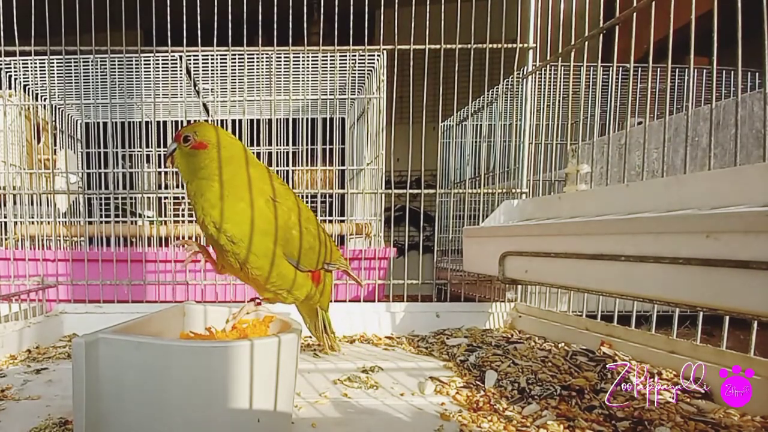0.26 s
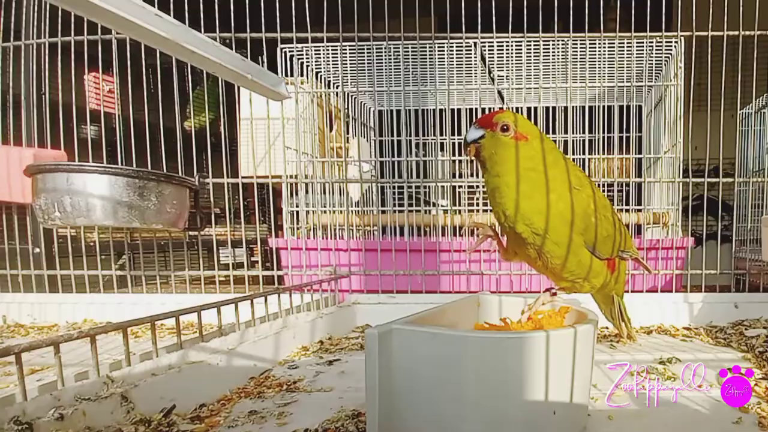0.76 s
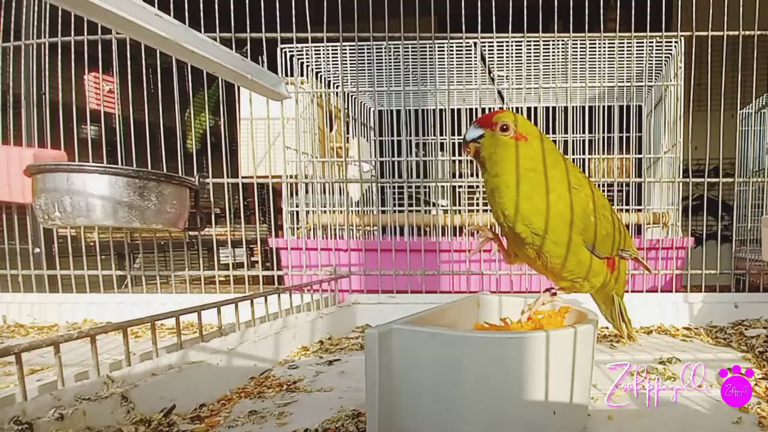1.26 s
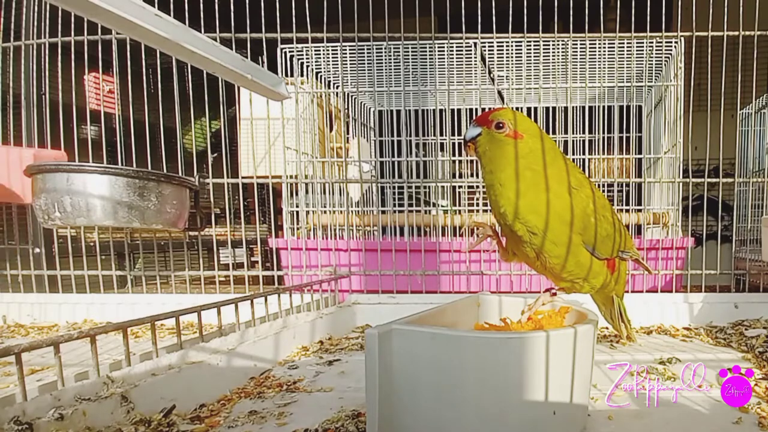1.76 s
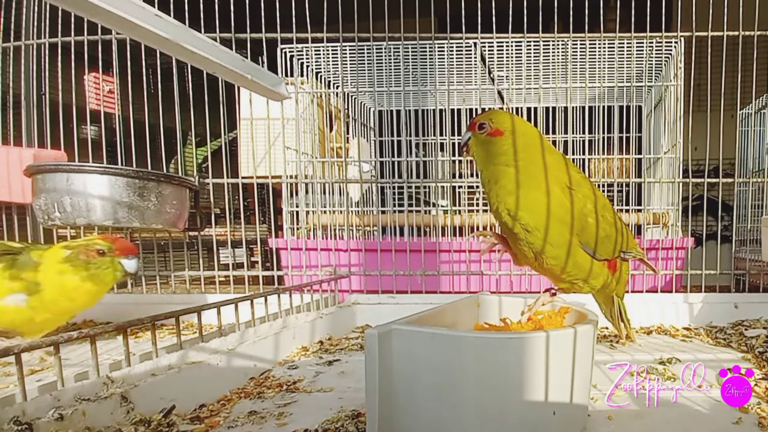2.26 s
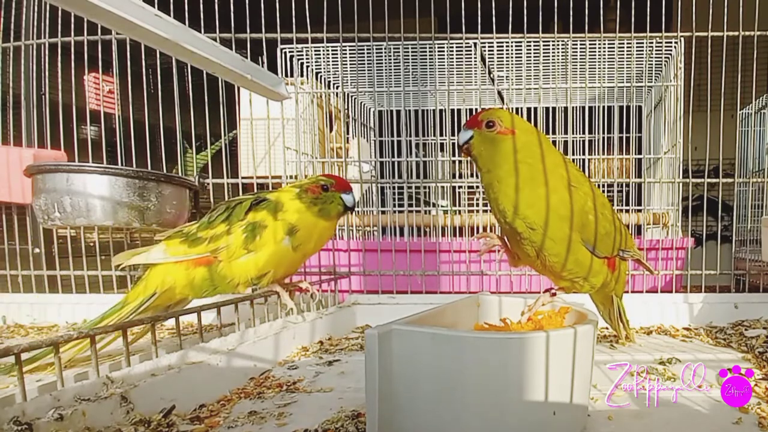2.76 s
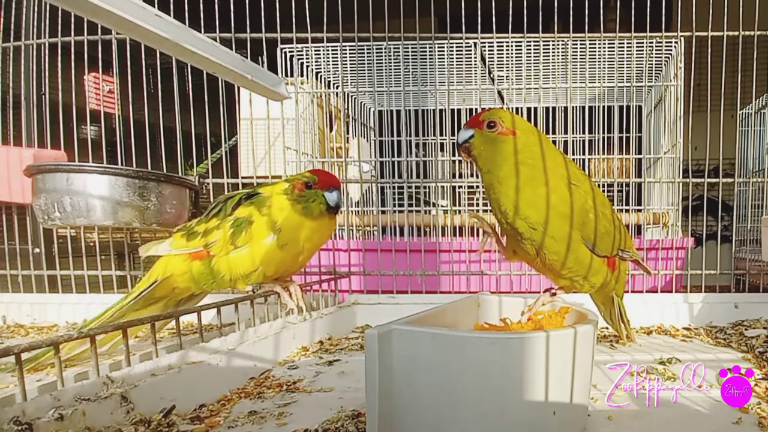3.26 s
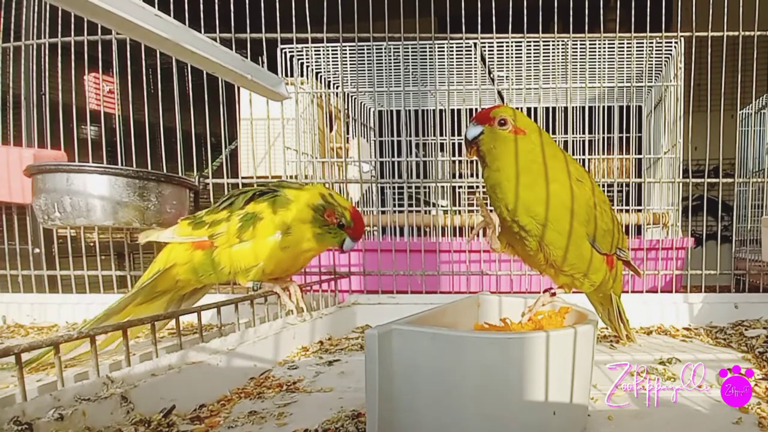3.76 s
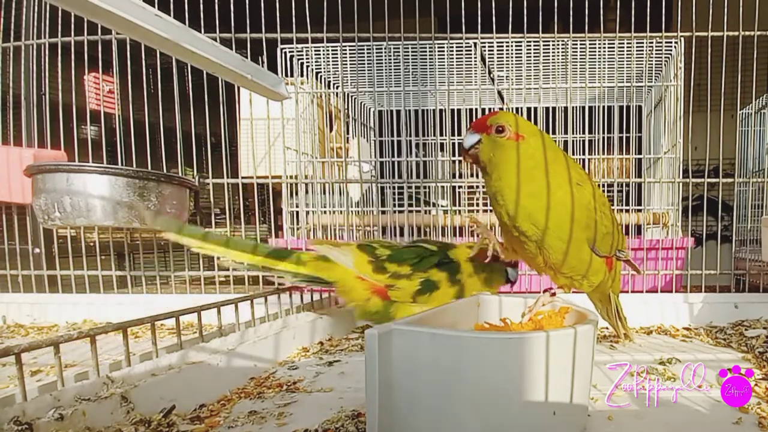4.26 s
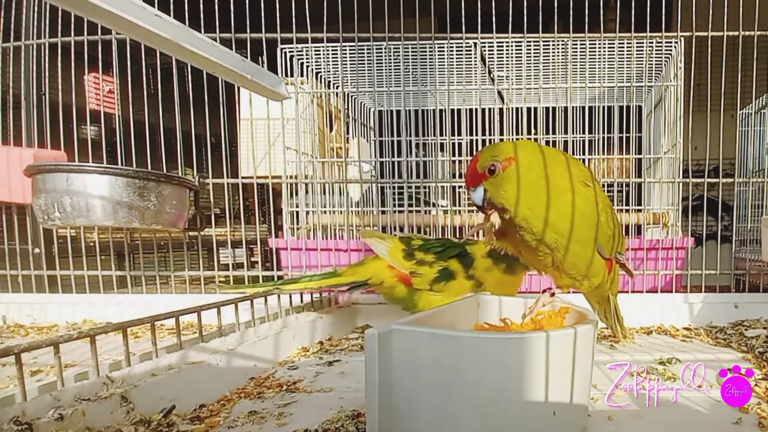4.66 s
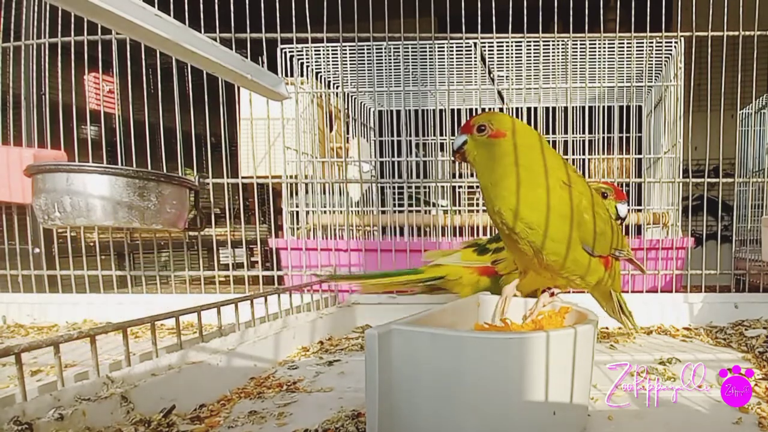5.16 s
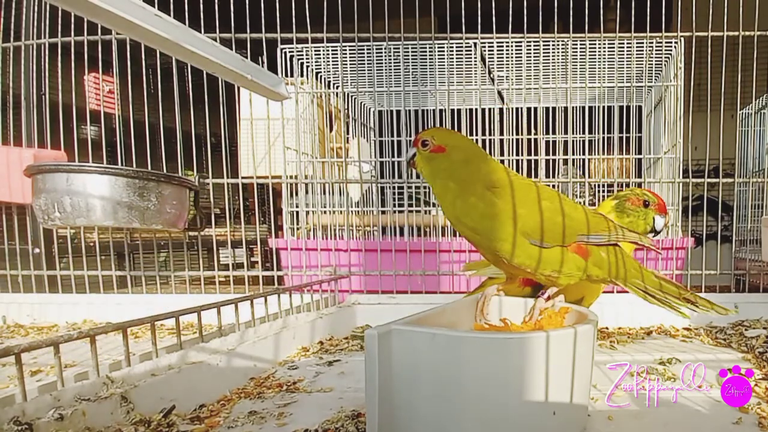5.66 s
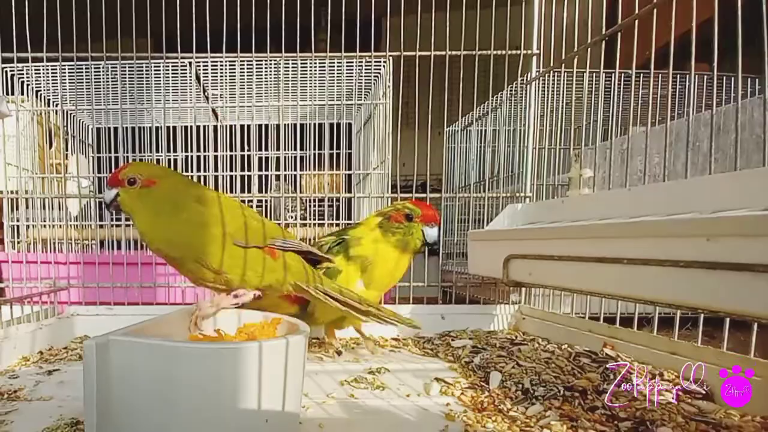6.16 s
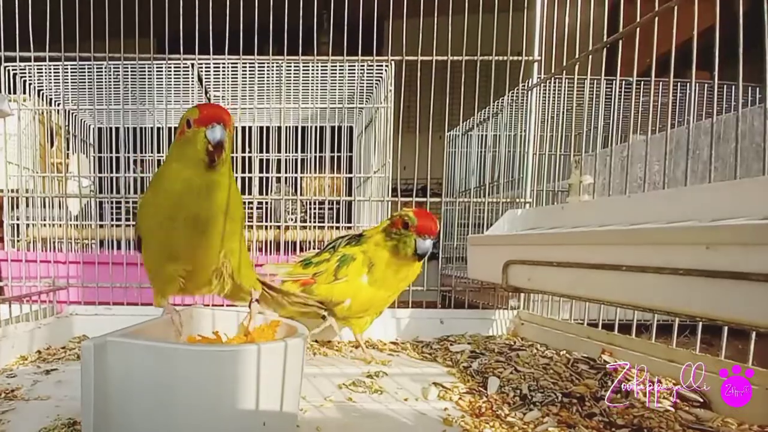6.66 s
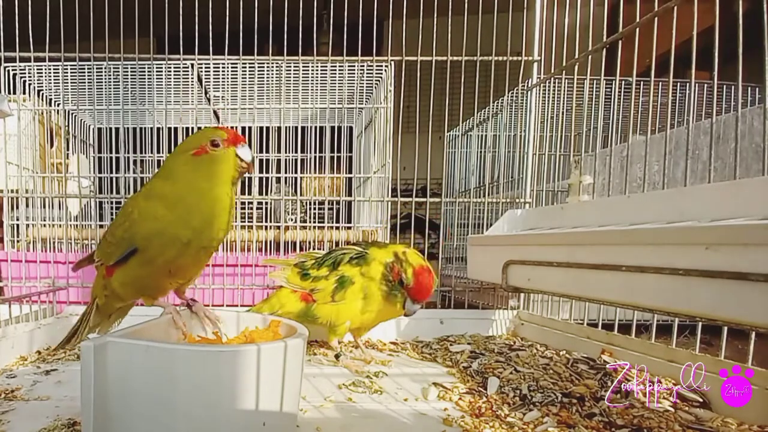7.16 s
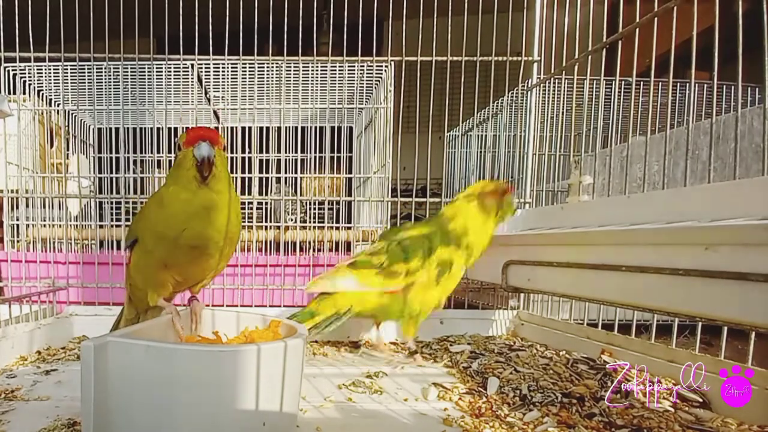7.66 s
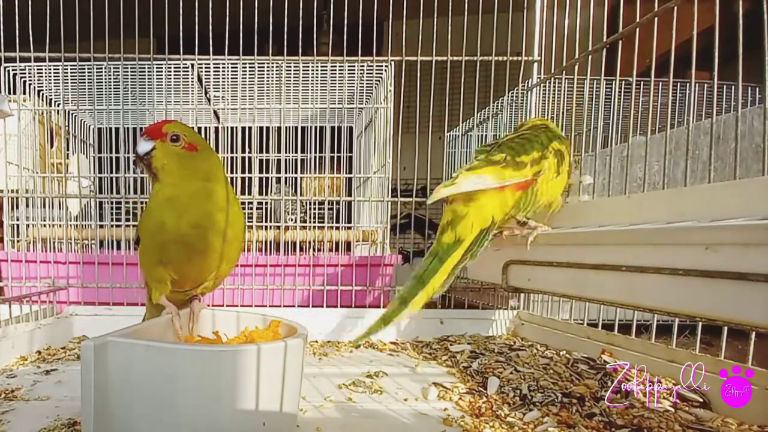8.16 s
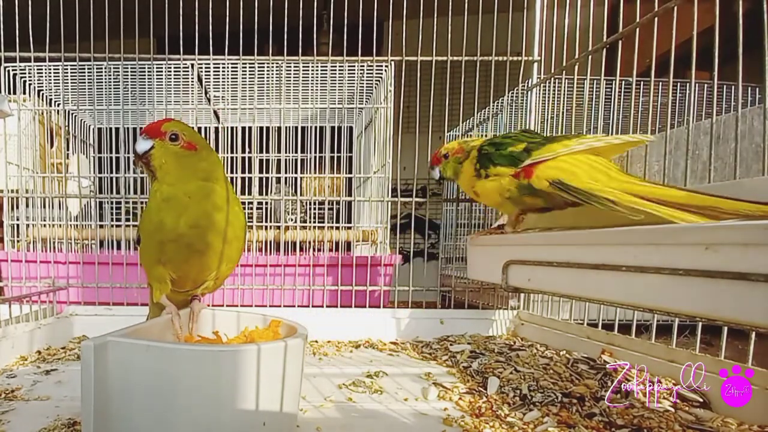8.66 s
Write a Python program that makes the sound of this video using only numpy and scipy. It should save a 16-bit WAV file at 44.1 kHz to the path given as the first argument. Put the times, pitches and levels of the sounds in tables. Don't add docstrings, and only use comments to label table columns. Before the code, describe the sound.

A quiet, hard-walled room with low rumble, light hiss and a faint drone that swells now and then, strongest around 5 s. Close by, small parrots move in a wire cage. The first 1.5 s hold only faint coos, thin distant piping and tiny husk ticks. Husks rustle at 1.6, a hollow dish knock lands at 1.8, and scrabbling with a short rising creak comes at 2.2-2.4. Two bright whistled chirps sweep upward at 3.1 and 3.3, ringing in the room over rustling. At 4.15-4.2 a hop gives sharp claw clicks and knocks; more snaps follow at 4.8 and 5.4. Taps and brushing scuffs come around 6-6.4, light pecks at 6.6, clicks at 7-7.1. From 7.4 it gets busiest: scrabbling, feathery brushes, a rising creak, a falling coo and the loudest crack at 7.7 with a soft thump. Claw ticks at 8.2 and small husk cracks finish.

```python
import sys
import numpy as np
from scipy import signal
from scipy.fft import rfft, irfft
from scipy.io import wavfile
from scipy.ndimage import uniform_filter1d

SR = 44100
rng = np.random.default_rng(int(sys.argv[2]) if len(sys.argv) > 2 else 0)


def how_loud(loudness_db):
    steps = np.asarray(loudness_db, float) / 20
    return 10 ** steps


def inscribe(sig):
    pcm = np.round(np.clip(np.atleast_2d(sig).T, -1, 1) * 32767)
    wavfile.write(sys.argv[1], SR, pcm.astype(np.int16))


N = 392490


def level(x, db):
    return x * how_loud(db) / np.sqrt(np.mean(x ** 2))


def shape(points, hz):
    f, db = np.transpose(points)
    return np.interp(np.log(hz + 1), np.log(f + 1), db)


def causal(db):
    cepstrum = irfft(db * np.log(10) / 20)
    half = cepstrum.shape[-1] // 2
    cepstrum[..., 1:half] *= 2
    cepstrum[..., half + 1:] = 0
    return np.exp(rfft(cepstrum))


def colour(x, points):
    gain = how_loud(shape(points, np.fft.rfftfreq(N, 1 / SR)))
    return irfft(rfft(x) * gain, N)


def walk(rate_hz):
    hold = int(SR / rate_hz)
    steps = np.repeat(rng.standard_normal(N // hold + 1), hold)
    return 2.11 * uniform_filter1d(uniform_filter1d(steps, hold), hold)[:N]


def grains(count):
    size_db = 2.5 * np.minimum(rng.exponential(size=(count, N)), 6)
    return rng.standard_normal((count, N)) * how_loud(size_db)


# (time [s], left microphone late by [samples], left minus right [dB])
STAND = [(0, -17, 4), (3.2, -16, 14), (4.2, -11.5, -7.5), (4.7, 0, -5), (6.2, 11, -13), (6.8, -6, -4.5),
         (7.7, 12.5, -15.5), (8.9, 7, -8)]


def place(times_s, peak_db, pan_db, waves):
    size = waves.shape[1]
    out = np.zeros((2, N + size + 64))
    when_s, lag_samples, _ = np.transpose(STAND)
    lags = np.interp(times_s, when_s, lag_samples)
    for s, db, pan, lag, wave in zip(times_s, peak_db, pan_db + 0 * times_s, lags, waves):
        for side, sign in enumerate((1, -1)):
            at = max(int(s * SR + sign * lag / 2), 0)
            out[side, at:at + size] += wave * how_loud(db + sign * pan / 2) / np.abs(wave).max()
    return out[:, :N]


def blows(table, t60_s, size, spread, push_cycles, pan_db):
    s, db, hz = np.transpose(table)[:, :, None]
    t = np.arange(size) / SR
    chance = rng.standard_normal((len(s), 3))
    modes = 0
    for k in (-1, 0, 1):
        mode_hz = hz * (1 + spread * k * (1 + 0.37 * chance[:, [k + 1]]))
        modes = modes + np.sin(2 * np.pi * mode_hz * t) * (1 - abs(k) * 0.67)
    swell = 1 - np.exp(-t * hz / push_cycles)
    decay = np.exp(-np.log(1000) * t / t60_s)
    return place(s[:, 0], db[:, 0], pan_db, modes * swell * decay)


def voice(notes, partials_db, rough, shake_hz, tremble_db, lag_samples, pan_db, throat_hz=20000):
    out = np.zeros(N)
    wobble, tremble = walk(shake_hz), how_loud(tremble_db * walk(350))
    for note in notes:
        a, b = max(int(note[0][0] * SR), 0), int(note[-1][0] * SR)
        s, hz, db = np.transpose(note)
        t = np.arange(a, b) / SR
        pitch = np.interp(t, s, hz)
        phase = 2 * np.pi * np.cumsum(pitch * (1 + rough * wobble[a:b])) / SR
        tone = 0
        for k, partial_db in enumerate(partials_db, 1):
            throat = 1 / (1 + (k * pitch / throat_hz) ** 6)
            tone = tone + how_loud(partial_db) * np.sin(k * phase) * throat
        ends = signal.windows.tukey(b - a, .15)
        out[a:b] += tone * how_loud(np.interp(t, s, db)) * ends * tremble[a:b]
    return np.array([np.roll(out, int(lag_samples)) * how_loud(pan_db / 2), out * how_loud(-pan_db / 2)])


def sung(calls, course, swell=1):
    rising = np.array(course, float)
    falling = np.c_[1 - rising[::-1, :2], rising[::-1, 2]]
    notes = []
    for s, long, first, last, db in calls:
        path = rising if last >= first else falling
        notes.append([(s + long * at, first + (last - first) * up, db + swell * under)
                      for at, up, under in path])
    return notes


# (time [s], peak [dB], brightest [Hz], length [ms])
CRACKS = [(0.9414, -37.5, 1820, 0.95), (0.9871, -28, 2460, 0.4), (1.6465, -21, 6700, 1.5),
          (2.3462, -25, 5220, 2.7), (2.4316, -12, 6200, 0.39), (4.78, -37.5, 5320, 0.9),
          (4.815, -5, 6110, 0.37), (6.2124, -30.5, 6630, 1.2), (6.58, -34, 6950, 1.13),
          (6.665, -34.5, 2800, 1.3), (7.0496, -34, 6750, 1.2), (7.106, -10.5, 6655, 0.35),
          (7.4406, -9.5, 6800, 0.64), (7.639, -10.5, 3173, 2.3), (1.822, -28, 6870, 1.2),
          (7.707, -22, 6670, 2.8), (7.7248, 1.5, 5560, 2.9), (7.8686, -26.5, 6520, 2.1),
          (8.2994, -37.5, 5140, 1.2), (8.6077, -23, 5200, 1.2), (8.6773, -31, 5180, 1.1),
          (8.69, -22.5, 4800, 0.496), (8.768, -29, 6740, 1.5), (8.8306, -20.5, 6600, 1.13),
          (8.8424, -29.5, 6640, 2.7)]
TAPS = [(0.8744, -48, 2010, 1.7), (1.0233, -38, 6500, 1.3), (1.2306, -41.5, 6200, 2.4),
        (1.79, -16.5, 5000, 2.3), (2.1733, -24, 5940, 0.73), (2.1799, -17, 3100, 0.51),
        (2.286, -26, 5400, 2.5), (2.2974, -15.5, 2550, 1.8), (4.145, -18.5, 5600, 1.3),
        (4.1543, -16, 4460, 3), (4.1847, -4, 6000, 0.66), (4.188, -8, 6150, 1.4), (5.4213, -6, 5800, 0.92),
        (5.9603, -10, 3020, 0.41), (6.0328, -32, 2530, 1.8), (6.124, -22.5, 6760, 0.6),
        (6.135, -15, 6700, 0.87), (6.699, -33.5, 6240, 2.3), (6.971, -13, 6480, 0.6),
        (6.9793, -21.5, 6280, 2.5), (7.4863, -20.5, 7126, 0.71), (7.7507, -10.5, 4100, 3.3),
        (8.2846, -35, 5140, 1.78), (8.1581, -22.5, 5870, 0.38), (4.0125, -30, 5330, 1),
        (4.606, -35, 5500, 0.93)]
STEPS = [(2.1665, -35, 5600, 0.87), (2.5341, -40, 5340, 2.5), (3.1127, -33, 3520, 2.5),
         (4.632, -20, 5600, 0.96), (4.805, -15, 5920, 0.875), (5.244, -19.5, 5620, 2.7),
         (5.333, -28.5, 5840, .9), (5.4161, -10, 3250, 0.244), (4.719, -40.5, 2680, 1.1),
         (6.502, -53, 2800, 1.1)]
# (frequency [Hz], density [dB/Hz])
SNAP = [(400, -13), (1000, -14), (2000, -11), (3500, -2.5), (6000, -8.5), (9000, -5.5), (13000, -10),
        (17000, -12)]


def clicks():
    s, db, hz, ms = np.transpose(CRACKS + TAPS + STEPS)
    treble_db = np.repeat([-3.5, -14, -33.5], [len(CRACKS), len(TAPS), len(STEPS)])
    t, f = np.arange(1024) / SR, np.fft.rfftfreq(1024, 1 / SR)
    chance = rng.standard_normal((len(s), len(t)))
    age = 1000 * t / np.clip(ms, .15, 2.2)[:, None]
    cracks = chance * np.abs(chance) ** 0.86 * age ** 0.46 * np.exp(-age)
    ring_db = 9 / (1 + ((f - hz[:, None]) / (.1 * hz[:, None])) ** 2)
    shelf_db = (treble_db[:, None] + 12) / (1 + (8000 / (f + 1)) ** 8)
    response = causal(shape(SNAP, f) + ring_db + shelf_db)
    when_s, _, stand_db = np.transpose(STAND)
    return place(s, db, np.interp(s, when_s, stand_db), irfft(rfft(cracks) * response))


# (time [s], peak [dB], frequency [Hz])
KNOCKS = [(1.797, -12, 1380), (1.809, -27.5, 508), (2.177, -31.5, 834), (2.305, -29.5, 502),
          (2.374, -42, 502), (4.156, -11.5, 1220), (4.192, -25, 563), (4.629, -34, 1330), (4.66, -35, 1220),
          (4.817, -34.5, 702), (5.254, -35.5, 1210), (5.424, -30, 1130), (5.966, -26.5, 652),
          (6.134, -30, 823), (6.177, -38, 1276), (6.97, -32.5, 1205), (7.107, -38.5, 1251),
          (7.44, -36, 1314), (7.497, -34, 1227), (7.521, -26, 1190), (7.654, -29, 947),
          (7.707, -18.5, 1404), (7.726, -6, 2045), (7.867, -27.5, 1330), (8.31, -41.5, 880),
          (2.376, -38, 1586), (2.181, -35, 1380), (6.662, -49.5, 680), (4.808, -28, 1200),
          (5.427, -29.5, 557), (7.752, -16.5, 2300), (7.728, -22.5, 738), (8.671, -43, 1395)]


def knocks():
    return blows(KNOCKS, t60_s=0.018, size=4096, spread=0.322, push_cycles=1.7, pan_db=-4.5)


# (time [s], peak [dB], frequency [Hz])
TICKS = [(4.194, -13.5, 744), (5.966, -22, 972), (6.986, -32, 700), (7.937, -43, 761), (7.991, -46, 1220),
         (8.122, -40, 1280), (8.127, -29, 1190), (8.184, -25.5, 1510), (8.191, -31, 1200),
         (8.192, -28, 2100), (8.207, -32, 1170), (8.218, -41, 1280)]


def ticks():
    return blows(TICKS, t60_s=0.0077, size=1024, spread=0.43, push_cycles=1.0, pan_db=-11.0)


# (time [s], peak [dB], frequency [Hz])
PECKS = [
    (6.5669, -43.5, 1318),
    (6.61, -50, 1290),
    (6.69, -58, 1260),
    (6.79, -50, 1306),
    (6.566, -53, 563.5),
    (6.566, -54.5, 793),
]


def pecks():
    return blows(PECKS, t60_s=0.15, size=16384, spread=0.0526, push_cycles=0.91, pan_db=1.0)


# (time [s], level [dB], drag [ms], dull share [dB], treble [dB])
SCUFFS = [(1.79, -43.5, 86, 8, -2), (2.166, -44.5, 105, -1, -13), (2.299, -42, 98, -2, 13),
          (2.444, -52, 105, -4, 18), (4.0116, -51.5, 140, -30, 17), (4.186, -39.5, 61.3, 6, -9.5),
          (4.607, -40, 45, -9.5, -16.5), (4.818, -47, 83, 1.5, -20), (5.316, -46.5, 71, -4, -3),
          (5.419, -44, 68, -10.5, 21), (4.411, -55.5, 95, -10.5, -7), (5.967, -51, 9.4, 16.5, -1),
          (6.14, -42, 10, 8.5, 23), (6.786, -58, 60, -6, 26), (7.371, -47, 15, -7.5, -20),
          (7.727, -41.5, 123, 1, -15.5), (8.156, -39, 35.6, -25, 10.5), (8.308, -66.5, 27, 7.5, -10),
          (8.67, -65, 26, 8.5, -5), (8.829, -48, 17, -14, 5), (5.56, -56.5, 103, -11.5, 8),
          (8.299, -61, 107, -7.5, 8)]
BRUSHES = [(.03, -64, 200, -9, 20.5), (1.3, -60.5, 110, -20, 5), (4.101, -62, 54, 8, -9),
           (1.568, -45.5, 148, -13, 17), (5.916, -39.5, 42, -4.5, -26), (6.347, -38.5, 50.5, -2.5, -3),
           (7.503, -32, 29, 2.5, 9), (7.611, -35, 29, 4, 30), (8.17, -56.5, 27, 18, -16),
           (8.54, -71.5, 50, 9, -8.5), (2.901, -70.5, 120, 2.5, -5), (7.69, -35.5, 23, 4.5, 5)]
# (frequency [Hz], density [dB/Hz])
HUSK = [(700, -12.5), (1500, -53), (2900, -3.5), (4000, 5.5), (6000, 1.5), (9000, -1), (12000, -3),
        (17000, -24.5)]
# (frequency [Hz], density [dB/Hz])
TRAY = [(300, -38.5), (520, 3), (800, -1), (1250, 5), (1600, 2.5), (2500, 2.5), (3500, -12.5),
        (6000, -36.5)]


def scuffs():
    rasp = grains(count=3)
    rasp = (rasp[:2] + .7 * rasp[2]) * how_loud(2.5 * walk(150))
    husks, tray = level(colour(rasp, HUSK), 0), level(colour(rasp, TRAY), 0)
    treble = level(colour(rasp, [(7000, -38.0), (8500, 1.5), (17000, 6.5)]), -21.0)
    gains, age = np.zeros((3, N + SR)), np.arange(SR // 2) / SR
    for drags, rise_s in ((SCUFFS, .00027), (BRUSHES, 0.013)):
        for s, db, ms, dull_db, treble_db in drags:
            at = int(s * SR)
            share = how_loud(db + np.array([[0], [dull_db], [treble_db]]))
            swell = 1 - np.exp(-age / rise_s)
            gains[:, at:at + len(age)] += share * swell * np.exp(-(1000 * age / ms) ** 1.62)
    return gains[0, :N] * husks + gains[1, :N] * tray + gains[2, :N] * treble


# (time [s], level [dB])
RUSTLE = [(0, -55.5), (.6, -84), (1.0, -67.5), (1.28, -67), (1.55, -45.5), (1.75, -62.5), (2.1, -55),
          (2.7, -89.5), (3.05, -62.5), (3.2, -43.5), (3.6, -59.5), (5.15, -59.5), (5.72, -86), (5.9, -54),
          (7.25, -72.5), (7.6, -40.5), (8.45, -83.5), (8.9, -60.5)]


def rustle():
    s, db = np.transpose(RUSTLE)
    flurry = how_loud(np.interp(np.arange(N) / SR, s, db))
    shifting = grains(count=2) * how_loud(2.5 * walk(18))
    husks = level(colour(shifting, HUSK), 0)
    tray = level(colour(shifting[::-1], TRAY), 0)
    return flurry * (husks + how_loud(-12.5) * tray)


# (time [s], peak [dB], frequency [Hz])
THUMPS = [
    (1.836, -35, 83.9),
    (3.15, -47.5, 99.45),
    (3.456, -44.5, 92.4),
    (4.191, -43.5, 78),
    (6.37, -33, 77),
    (7.551, -42, 114.8),
    (7.733, -35.5, 81.9),
]


def thumps():
    return blows(THUMPS, t60_s=0.62, size=32768, spread=0.28, push_cycles=0.058, pan_db=2.5)


# (time [s], length [s], first [Hz], last [Hz], peak [dB])
CREAKS = [
    (2.22, 0.081, 557.7, 1181, -38.5),
    (2.33, .065, 690, 510.2, -54),
    (7.57, 0.074, 531, 1210, -34),
]
CREAK_PARTIALS_DB = [-63, -3.5, -10, -23.5]
# (share of length, share of glide, level [dB])
CREAK = [(0, 0, 0), (.2, 0, -3.5), (.55, .06, 1), (.75, .55, -1.5), (.9, .92, 0), (1, 1, -5.5)]
# (share of length, share of glide, level [dB])
CREAK_BUZZ = [(0, 0, -11), (.2, 0, -6), (.55, .06, -0.5), (.75, .55, -14), (.9, .92, -17.5), (1, 1, -20.5)]


def creaks():
    pure = voice(sung(CREAKS, CREAK), [0], rough=.005, shake_hz=400, tremble_db=2.03,
                 lag_samples=0, pan_db=-3.5)
    buzz = voice(sung(CREAKS, CREAK_BUZZ), CREAK_PARTIALS_DB, rough=0.0038, shake_hz=260, tremble_db=3.0,
                 lag_samples=0, pan_db=-1.0, throat_hz=2300)
    return pure + buzz


# (time [s], length [s], first [Hz], last [Hz], peak [dB])
COOS = [
    (.845, 0.032, 560, 582, -61.5),
    (.87, .015, 650, 900, -65),
    (.895, 0.079, 1162, 1090, -66),
    (1.066, 0.056, 705, 688, -56),
    (1.12, .1, 760, 675, -66),
    (7.661, 0.028, 960, 627, -37),
    (8.325, 0.0655, 762, 614, -55.5),
]
# (share of length, share of glide, level [dB])
FLAT = [(0, 0, -5.5), (.3, .3, 0.5), (.7, .75, -1.5), (1, 0.91, -3)]


def coos():
    return voice(sung(COOS, FLAT), [0, -4, -25], rough=0.01, shake_hz=270, tremble_db=4.5,
                 lag_samples=-6, pan_db=3.0, throat_hz=1500)


# (time [s], length [s], first [Hz], last [Hz], peak [dB])
CHIRPS = [
    (3.07, .1, 4860, 7370, -21.5),
    (3.268, .088, 4754, 7373, -20.5),
]
# (share of length, share of glide, level [dB])
WHISTLE = [(0, 0, -27), (.3, .28, -13), (.47, .45, -2), (.65, .67, 0), (.82, .88, -7), (1, 1, -13)]


def whistles():
    notes = sung(CHIRPS, WHISTLE)
    pure = voice(notes, [0], rough=.011, shake_hz=1500, tremble_db=1.5, lag_samples=-18, pan_db=-3)
    octave = voice(sung(CHIRPS, WHISTLE, swell=0.39), [-60, -22], rough=0.012, shake_hz=1500,
                   tremble_db=4.0, lag_samples=-16.5, pan_db=-5.5)
    breath = voice(notes, [-25, -27], rough=.08, shake_hz=3000, tremble_db=3, lag_samples=-18, pan_db=-3)
    return pure + octave + breath


# (time [s], length [s], first [Hz], last [Hz], peak [dB])
CHURRS = [
    (3.11, 0.09, 2507, 2720, -46.5),
    (3.29, .11, 2300, 2758, -47),
]
# (time [s], length [s], first [Hz], last [Hz], peak [dB])
PIPES = [
    (.04, .2, 4960, 5070, -62),
    (1.38, .08, 5517, 5740, -68),
]
# (share of length, share of glide, level [dB])
ARCH = [(0, 0.019, -6), (.55, 0.68, -1), (1.001, 1, -19.5)]


def churrs():
    return voice(sung(CHURRS, ARCH), [0], rough=0.03, shake_hz=900, tremble_db=3,
                 lag_samples=-15.5, pan_db=1)


def pipes():
    return voice(sung(PIPES, ARCH), [0, -9], rough=0.0182, shake_hz=500, tremble_db=5,
                 lag_samples=-14.5, pan_db=1)


# (time
# [s], length [s], first [Hz], last [Hz], peak [dB])
CHATTER = [
    (.825, 0.056, 1750, 1680, -66.5),
    (.875, 0.037, 1950, 2250, -72.5),
    (5.6, 0.18, 1530, 1380, -65.5),
    (8.282, 0.021, 1800, 1930, -58),
    (8.606, .02, 2000, 1600, -63),
    (8.688, .02, 1900, 1700, -69.5),
    (8.78, 0.039, 1820, 1900, -68),
    (4.41, 0.079, 2950, 3000, -62.5),
    (3.068, 0.046, 6900, 7600, -53),
]


def chatter():
    return voice(sung(CHATTER, FLAT), [0, -15], rough=.05, shake_hz=500, tremble_db=2.5,
                 lag_samples=-5, pan_db=-2)


# (time [s], length [s], pitch [Hz], level [dB])
SQUAWKS = [
    (.02, .16, 3200, -81.5),
    (1.299, .1, 3000, -88),
    (2.046, 0.1, 3300, -64.5),
    (2.926, 0.019, 2770, -91),
    (3.655, 0.0514, 2710, -74.5),
    (3.815, 0.072, 3060, -72.5),
    (4.01, 0.042, 2890, -59),
]


def squawks():
    notes = [[(s, .97 * hz, db), (s + long, 1.05 * hz, db + 0.5)] for s, long, hz, db in SQUAWKS]
    return voice(notes, [0.5, 7.5, 4.4, 5.0], rough=.07, shake_hz=890, tremble_db=4,
                 lag_samples=-10.5, pan_db=12.5)


def echo(x, db, t60_s, start_s):
    t = np.arange(SR) / SR
    noise = rng.standard_normal((2, SR))
    dull = signal.sosfilt(signal.butter(2, 7500, fs=SR, output="sos"), noise)
    fall = np.log(1000) * t / t60_s
    tail = dull * np.exp(-fall) + (noise - dull) * np.exp(-1.8 * fall)
    tail = tail * (1 - np.exp(-t / start_s))
    tail = tail / np.sqrt(np.sum(tail ** 2, axis=1, keepdims=True))
    return how_loud(db) * signal.fftconvolve(x.mean(axis=0, keepdims=True), tail, axes=1)[:, :N]


# (time [s], hold [s], level [dB])
DRONE = [
    (-.1, 0.34, -61.5),
    (1.53, 1, -63),
    (3.29, 0.88, -65),
    (5.073, 0.32, -52),
]


def swells():
    t = np.arange(N) / SR
    strength, rise_s, fall_s = how_loud(-70), 0.051, 0.12
    for s, hold, db in DRONE:
        rise = 1 / (1 + np.exp(np.clip((s - t) / rise_s, -50, 50)))
        strength = strength + how_loud(db) * rise * np.exp(-np.maximum(t - s - hold, 0) / fall_s)
    return strength


# (frequency [Hz], width [Hz], level [dB])
DRONE_MODES = [(258, 66, 3.5), (351.4, 20, 1.5), (165, 10, -3.5), (296, 450, 6.5)]


def drone():
    f = np.fft.rfftfreq(N, 1 / SR)
    modes = sum(how_loud(db) / np.sqrt(w) / (1 + (2 * (f - hz) / w) ** 2) for hz, w, db in DRONE_MODES)
    noise = rng.standard_normal(N) + .6 * rng.standard_normal((2, N))
    return level(irfft(rfft(noise) * modes, N), -2.3) * swells()


# (frequency [Hz], density [dB/Hz])
AIR = [(15, -74.5), (25, -49), (56, -2.5), (85, 4), (111, -5), (128, -5.5), (197, -12.5), (300, -21.5),
       (483, -19), (7920, -43.5), (15200, -31.5), (16500, -52.5)]


def rumble():
    shared, own = rng.standard_normal(N), rng.standard_normal((2, N))
    bass = signal.sosfilt(signal.butter(1, 500, fs=SR, output="sos"), shared)
    return level(colour(own + .6 * bass, AIR), -59.5) * how_loud(0.8 * walk(4))


def scene():
    near = clicks() + knocks() + ticks() + pecks() + scuffs() + creaks() + coos()
    near = signal.sosfilt(signal.butter(3, 400, "high", fs=SR, output="sos"), near)
    far = whistles() + churrs() + pipes() + chatter() + squawks()
    cage = echo(near, db=-6, t60_s=0.064, start_s=0.00015)
    room = echo(near, db=-12, t60_s=0.28, start_s=0.015)
    far_room = echo(far, db=7, t60_s=0.41, start_s=0.0032)
    return near + far + cage + room + far_room + thumps() + rustle() + drone() + rumble()


def top_cut(x):
    return signal.sosfilt(signal.butter(12, 16670, fs=SR, output="sos"), x)


# (frequency [Hz], gain [dB])
MIC = [(20, -5), (2900, 2.5), (3600, -2), (4500, 1), (6300, 8), (7100, 1), (7450, -9), (8300, -6.5),
       (9500, -1), (15600, 4), (16100, -14.5), (17000, -51.5)]


def record(dry):
    response = irfft(causal(shape(MIC, np.fft.rfftfreq(1024, 1 / SR))))
    heard = signal.fftconvolve(dry, response[None], axes=1)[:, :N]
    limit = .8
    mix = limit * np.tanh(heard / limit)
    return top_cut(mix)


dry = scene()
out = record(dry)
inscribe(out)
```